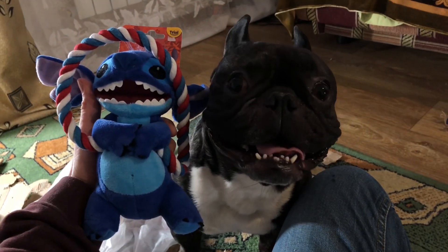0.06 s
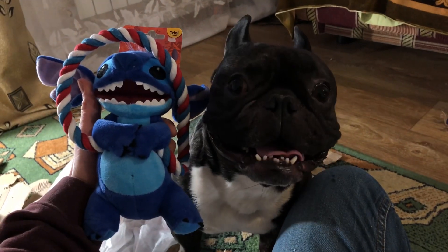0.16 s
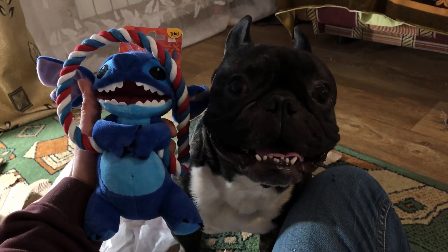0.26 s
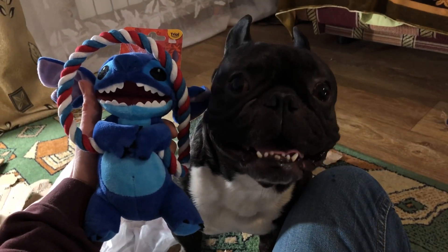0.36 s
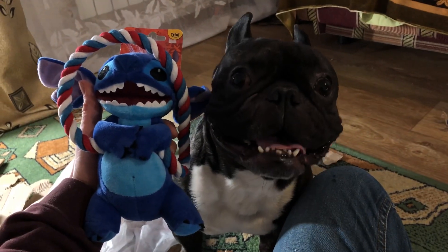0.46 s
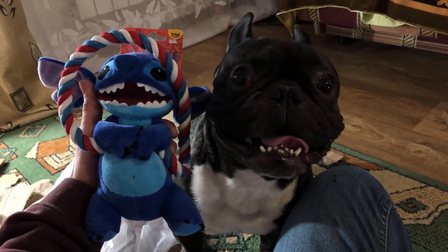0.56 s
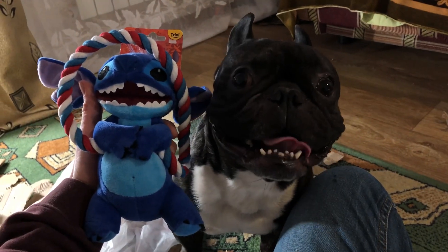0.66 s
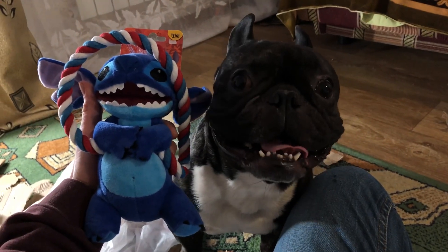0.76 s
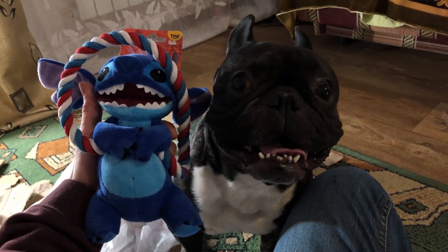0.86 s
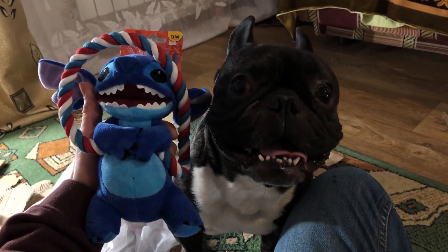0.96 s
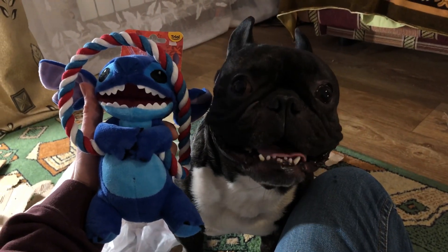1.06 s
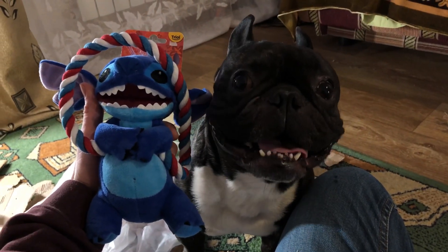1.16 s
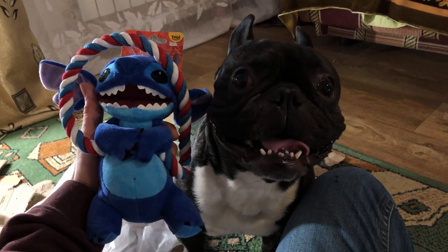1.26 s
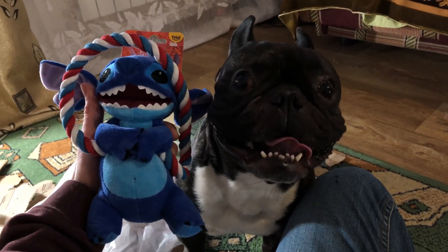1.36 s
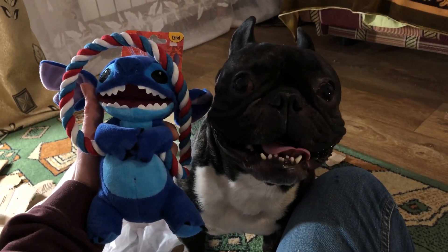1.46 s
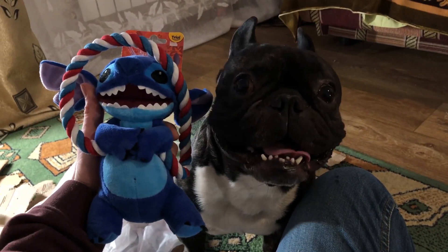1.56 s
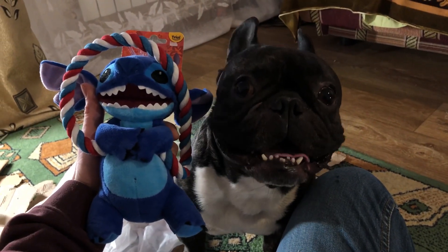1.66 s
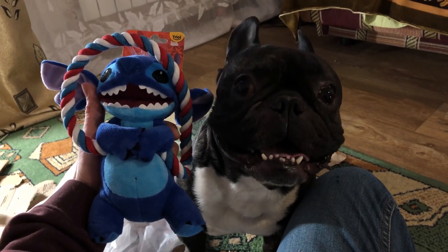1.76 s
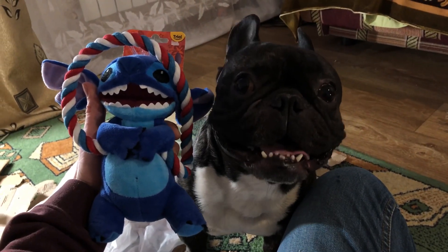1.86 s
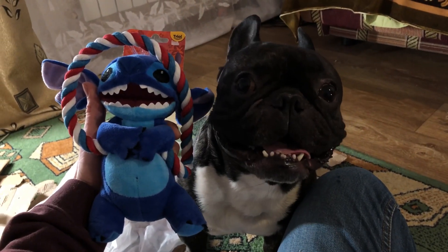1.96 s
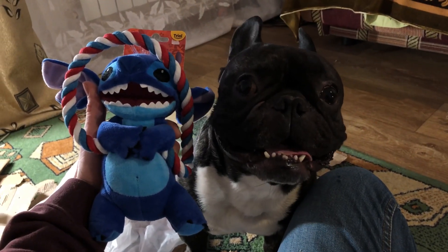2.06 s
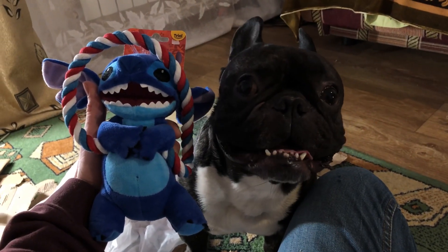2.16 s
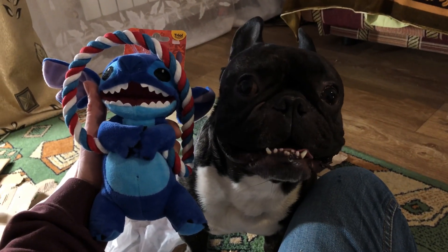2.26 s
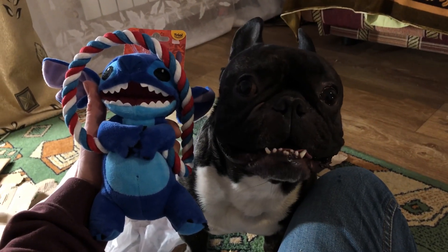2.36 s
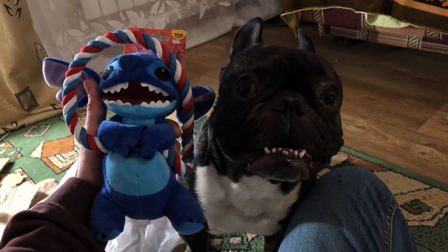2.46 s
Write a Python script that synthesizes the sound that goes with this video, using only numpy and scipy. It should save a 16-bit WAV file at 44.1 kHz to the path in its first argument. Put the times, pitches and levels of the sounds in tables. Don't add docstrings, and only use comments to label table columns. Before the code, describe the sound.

A small flat-faced dog growls in rattling, snorting breaths, each ended by a sharp snort indoors

```python
import sys
import numpy as np
from scipy import signal
from scipy.fft import rfft, irfft
from scipy.io import wavfile
from scipy.ndimage import uniform_filter1d

SR = 44100
rng = np.random.default_rng(int(sys.argv[2]) if len(sys.argv) > 2 else 0)


def rack_gain(trim_db):
    fader = np.asarray(trim_db, float)
    return 10 ** (fader / 20)


def persist_wave(psi):
    counts = np.round(np.clip(psi, -1, 1) * 32767).astype(np.int16)
    wavfile.write(sys.argv[1], SR, np.atleast_2d(counts).T)


N = 110250

# (frequency [Hz], density [dB per Hz])
TONE_SPECTRUM = [(18, -26), (30, 4.5), (160, -11), (197, -14.5), (270, -8.5), (307, -7), (728, -13),
                 (1050, -17.5), (15500, -32.5)]
TONE_DB, HUM_HZ, HUM_DB = -73, 196.6, -75.5
# (frequency [Hz], decay time t60 [s])
ROOM_DECAY = [(70, 3.6), (140, 3.3), (400, .6), (1500, 0.54), (4000, 0.24), (12000, 0.67)]
ROOM_DB, MIC_CUT_HZ = -25, 54

# (time [s], pitch [Hz], level [dB])
WHIMPER = [
    (2.12, 610, -97),
    (2.172, 591, -83.5),
    (2.22, 549, -71.5),
    (2.249, 452, -79),
    (2.29, 445, -90),
]

SWELL_POWER, WEAK_LOBE = 1.3, 0.65
RASP_HZ, RASP_DB = 260, 1
JET_EASE_S, CRACK_DB = 0.0046, -20
# (frequency [Hz], width [Hz], level [dB])
NOSTRIL_JET = [(8610, 120, 8), (8990, 600, 7.5), (10070, 530, 2), (11380, 820, 0.5), (12600, 230, -15),
               (13350, 3600, -5)]

# (start [s], length [s], effort [dB], palate flaps [Hz], nose pitch at the start [Hz])
SNORTS = [
    (0.201, 0.14, -35.5, 48.15, 1438),
    (.91, 0.14, -33.5, 43.72, 1407),
    (1.593, 0.14, -34.5, 52.65, 1330),
]
RISE_S, SAG_DB, FALL_DB_PER_S = 0.028, -6.5, 537
BUILD_DB, BUILD_SHARE = -2, 0.48
NOSE_END_HZ, FIRST_SLAP_S = 1540, 0.023
SNORT_JITTER, SNORT_DEPTH, SNORT_SPREAD_DB = 0.05, 0.66, 1.2
SNORT_SLAP_DB, SNORT_HISS_DB = -9.5, -13
# (frequency [Hz], width [Hz], level [dB])
NOSE = [(1490, 144, 7), (2040, 710, -4.5), (3430, 496, -6), (4750, 350, -8.5), (6490, 1200, -14.5),
        (486, 86, -5), (1210, 200, 0), (783, 900, -15)]
# (frequency [Hz], width [Hz], level [dB])
CHEST = [(75.6, 7.6, -9), (104.4, 77, 3), (127.8, 20.6, 8.5), (199, 45.3, -15.5), (342.6, 260, -9.5),
         (430, 36.7, -25)]
# (frequency [Hz], width [Hz], level [dB])
SIGH = [(1553, 260, 0.5), (3130, 220, -6), (2300, 1300, -17.5), (600, 600, -14), (125, 40, 6),
        (5500, 2900, -24)]
SIGH_DB, SIGH_FADE_DB_PER_S = -23, 82
DRONE_HZ, DRONE_DB, DRONE_FADE_DB_PER_S = 70.7, -29, 29

# (time [s], airflow [dB], palate slap [dB re airflow], nostril hiss [dB re airflow])
FIRST_GROWL = [
    (0, -48, -1, -21),
    (.025, -49, -3.5, -23),
    (.06, -50, -3.5, -20.5),
    (.13, -53, -10.5, -19),
    (.152, -58, -4.5, -13.5),
    (.165, -61.5, -3.5, -24.5),
    (.19, -66, 0, -20),
]
# (time [s], airflow [dB], palate slap [dB re airflow], nostril hiss [dB re airflow])
GROWLS = [
    [(0.44, -68, -16, -26), (0.478, -51.5, -11, -28), (0.488, -52.5, -14, -28), (0.558, -49.5, 0.5, -24.5),
     (0.618, -52.5, -15.5, -26.5), (0.664, -48, -3, -21), (0.672, -61, 3.5, -19), (0.7, -49.5, -4, -34)],
    [(0.7, -53, -20, -34), (0.708, -59.5, -4, -22), (0.744, -47.5, 0.5, -13), (0.802, -46, -6, -23),
     (0.828, -46.5, -8, -16), (0.862, -47.5, -1, -17), (0.88, -46.5, -9, -21), (0.9, -63.5, 10, -22.5)],
    [(1.13, -80.5, 9, -18.5), (1.168, -51.5, -14.5, -31), (1.172, -54, -12, -27), (1.25, -44.5, -6.5, -26),
     (1.272, -47.5, -5.5, -18), (1.28, -43, -2.5, -25), (1.318, -52.5, -13, -20), (1.335, -51.5, -2, -33)],
]
# (time [s], airflow [dB], palate slap [dB re airflow], nostril hiss [dB re airflow])
LAST_GROWL = [
    (1.335, -52.5, -1, -22),
    (1.36, -48, -14.5, -24),
    (1.42, -51, 3, -19.5),
    (1.435, -61.5, 6, -32),
    (1.46, -54.5, -8, -20),
    (1.51, -51, -7.5, -18),
    (1.56, -54.5, -6.5, -14),
    (1.575, -64, 20, -12),
]
GROWL_FLAPS_HZ, GROWL_JITTER, GROWL_DEPTH, GROWL_SPREAD_DB = 54.7, 0.32, 0.41, 3
# (frequency [Hz], width [Hz], level [dB])
THROAT = [(1338, 258, -0.5), (2275, 214, -1), (3570, 400, -16), (4400, 336, -11), (5420, 260, -22),
          (6390, 420, -22.5), (884, 430, -15)]
THROAT_WOBBLE = 0.012
# (frequency [Hz], width [Hz], level [dB])
BELLY = [(73.7, 9.8, 0), (108.3, 37, -3.5), (140, 45.7, 0.5), (216, 64, -4), (322.5, 116, -11),
         (436.4, 75, -12)]
# (time [s], air burst [dB re airflow], thump [dB re slaps])
CATCHES = [(0.117, 2, 6.5), (0.517, -6, -9), (0.536, 7, 5.5), (0.555, -1.5, 5), (0.575, 3.5, -6),
           (0.633, 7, 7), (0.663, 0.5, -5.5), (.766, -2, 6.5), (.798, 6, 6.5), (0.818, 3, 4),
           (0.854, -4, 8), (1.167, 2.5, 1), (1.208, -2.5, 6.5), (1.286, 3.5, 3.5), (1.313, 7, 7),
           (1.381, -1.5, 1.5), (1.427, 5, 4)]
CATCH_S = 0.004


def read(points, hz):
    f, value = np.transpose(points)
    return np.interp(np.log(hz + 1), np.log(f + 1), value)


def evened(x):
    return x / np.sqrt(np.mean(x ** 2) + 1e-20)


def wander(hz):
    lowpass = signal.butter(2, hz, fs=SR, output="sos")
    return evened(signal.sosfilt(lowpass, rng.standard_normal(N)))


def resonate(x, hz, width_hz):
    r = np.exp(-np.pi * width_hz / SR)
    if np.ndim(hz) == 0:
        return 2 * signal.lfilter([1 - r], [1, -r * np.exp(2j * np.pi * hz / SR)], x).real
    turn = np.exp(2j * np.pi * np.cumsum(hz) / SR)
    return 2 * (turn * signal.lfilter([1 - r], [1, -r], x / turn)).real


def room_tone():
    spectrum = rfft(rng.standard_normal(N))
    hiss = irfft(spectrum * rack_gain(read(TONE_SPECTRUM, np.fft.rfftfreq(N, 1 / SR))), N)
    hum = resonate(rng.standard_normal(N), HUM_HZ, 4)
    return rack_gain(TONE_DB + 0.8 * wander(2.4)) * evened(hiss) + rack_gain(HUM_DB) * evened(hum)


def room(x):
    taps = np.zeros(SR)
    at = np.arange(300, SR - 20, 20)
    taps[at + rng.integers(0, 20, len(at))] = rng.choice([-1., 1.], len(at))
    hz, t, z = signal.stft(taps, SR, nperseg=512)
    decay = rack_gain(-60 * t / read(ROOM_DECAY, hz)[:, None])
    tail = signal.istft(z * decay, SR, nperseg=512)[1]
    return signal.fftconvolve(x, tail / np.linalg.norm(tail))[:N]


def whimper():
    t = np.arange(N) / SR
    s, hz, db = np.transpose(WHIMPER)
    whistle = evened(resonate(rng.standard_normal(N), np.interp(t, s, hz), 30))
    return rack_gain(np.interp(t, s, db, left=-140, right=-140)) * whistle


def tract(x, peaks, glide=1, air=0, count=1):
    total = 0
    for k, (hz, width_hz, db) in enumerate(peaks):
        hz = hz * (glide if k < count else 1)
        width_hz = 1.58 * width_hz
        source = x + air * rng.standard_normal(N)
        total = total + rack_gain(db) * resonate(resonate(source, hz, width_hz), hz, width_hz)
    return total


def palate(start, flaps_hz, jitter, depth, spread_db):
    turns = (np.arange(N) / SR - start) * flaps_hz + jitter * wander(18.78) + 500
    turns = np.maximum.accumulate(turns)
    size = rack_gain(spread_db * rng.standard_normal(2000))[turns.astype(int)]
    depth = np.clip(depth, 0, 1)
    lobes = (2 * turns % 1) ** SWELL_POWER * np.where(turns % 1 < 0.5, WEAK_LOBE, 1)
    gate = uniform_filter1d(size * (1 - depth + 2.85 * depth * lobes), size=40)
    slaps = np.diff(np.floor(turns), append=np.floor(turns[-1])) * size
    return gate * rack_gain(RASP_DB * wander(RASP_HZ)), slaps


def breath(gate, slaps, airway, body, glide, flow_db, slap_db, hiss_db, moving=1):
    slaps = evened(slaps)
    jet_gate = uniform_filter1d(gate, size=max(round(JET_EASE_S * SR), 1))
    push = rack_gain(flow_db + slap_db) * (slaps + 0.39 * rng.standard_normal(N))
    thump = tract(push, body) / np.sqrt(np.mean(tract(slaps, body) ** 2))
    hiss = evened(tract(rack_gain(CRACK_DB) * slaps, airway, glide, gate, count=moving))
    jet = evened(tract(0, NOSTRIL_JET, 0.94, jet_gate))
    return rack_gain(flow_db) * (hiss + rack_gain(hiss_db) * jet) + thump


def snort(start, length, effort_db, flaps_hz, nose_hz):
    u = np.arange(N) / SR - start
    share = np.clip(u / length, 0, 1)
    late = np.maximum(u - length, 0)

    build_db = BUILD_DB * np.maximum(1 - share / BUILD_SHARE, 0)
    blow = rack_gain(build_db + SAG_DB * share ** 3 - FALL_DB_PER_S * late) + 1e-7
    rise = np.clip(u / RISE_S + 0.42, 1e-6, 1) ** 2
    flow_db = effort_db + 20 * np.log10(blow * rise)
    depth = SNORT_DEPTH * (1 - share ** 6)
    gate, slaps = palate(start + FIRST_SLAP_S, flaps_hz, SNORT_JITTER, depth, SNORT_SPREAD_DB)
    glide = (nose_hz + (NOSE_END_HZ - nose_hz) * share) / NOSE[0][0]
    blast = breath(gate, slaps, NOSE, CHEST, glide, flow_db, SNORT_SLAP_DB, SNORT_HISS_DB)

    sigh = rack_gain(effort_db + SIGH_DB - SIGH_FADE_DB_PER_S * late) * evened(tract(0, SIGH, 0.91, 1))
    drone = np.sin(2 * np.pi * DRONE_HZ * u + 0.8 * wander(7.4))
    drone = rack_gain(effort_db + DRONE_DB - DRONE_FADE_DB_PER_S * late) * drone
    return blast + share * (sigh + drone)


def growl(rows):
    t = np.arange(N) / SR
    s, flow_db, slap_db, hiss_db = np.transpose(rows)
    flow_db = np.interp(t, s, flow_db, left=-140, right=-140)
    slap_db, hiss_db = np.interp(t, s, slap_db), np.interp(t, s, hiss_db)
    gate, slaps = palate(s[0], GROWL_FLAPS_HZ, GROWL_JITTER, GROWL_DEPTH, GROWL_SPREAD_DB)
    for at, burst_db, thump_db in CATCHES:
        gate = gate + rack_gain(burst_db) * np.exp(-((t - at) / CATCH_S) ** 2)
        slaps = slaps + rack_gain(thump_db) * (np.arange(N) == round((at + CATCH_S / 2) * SR))
    wobble = 1 + THROAT_WOBBLE * wander(25)
    return breath(gate, slaps, THROAT, BELLY, wobble, flow_db, slap_db, hiss_db, moving=len(THROAT) - 3)


def scene():
    growls = sum(growl(rows) for rows in [FIRST_GROWL] + GROWLS + [LAST_GROWL])
    snorts = sum(snort(*row) for row in SNORTS)
    dog = whimper() + snorts + growls
    return (room_tone() + rack_gain(ROOM_DB) * room(dog) + dog)[None]


def band_limit(x):
    return signal.sosfilt(signal.butter(12, 15710, fs=SR, output="sos"), x)


def record(dry):
    bass_cut = signal.butter(4, MIC_CUT_HZ, "high", fs=SR, output="sos")
    mix = signal.sosfilt(bass_cut, dry)
    return band_limit(mix)


dry = scene()
out = record(dry)
persist_wave(out)
```